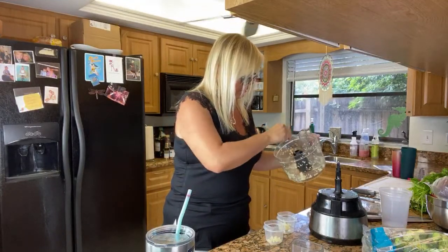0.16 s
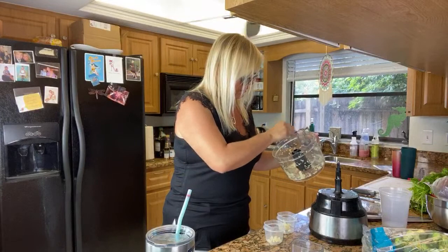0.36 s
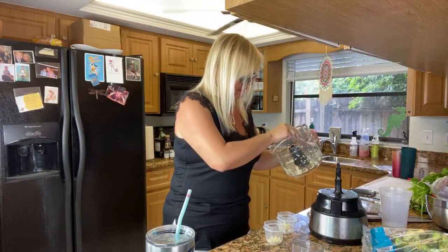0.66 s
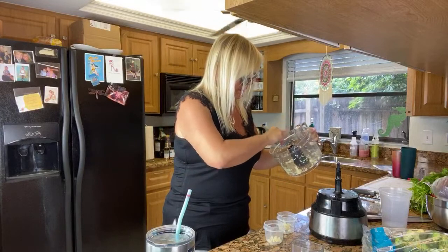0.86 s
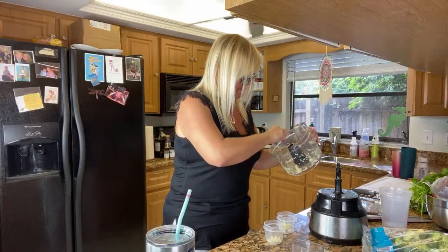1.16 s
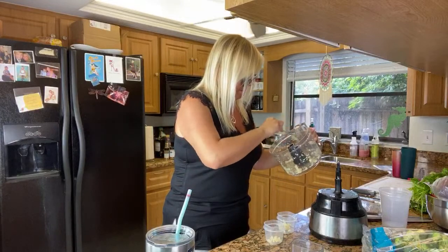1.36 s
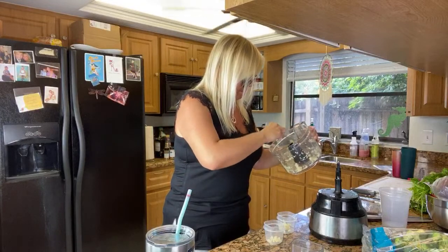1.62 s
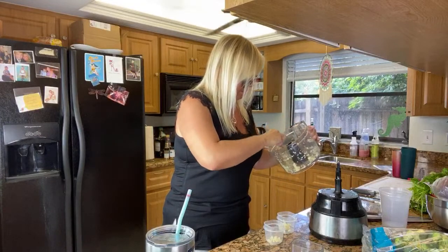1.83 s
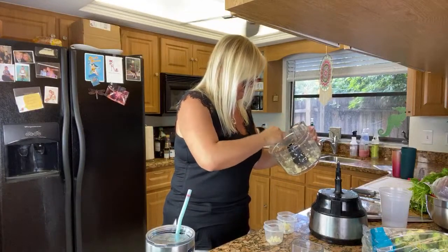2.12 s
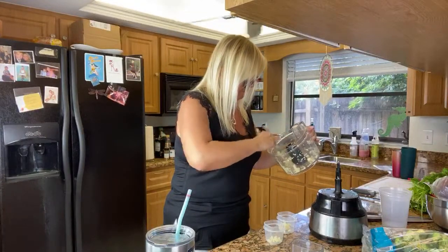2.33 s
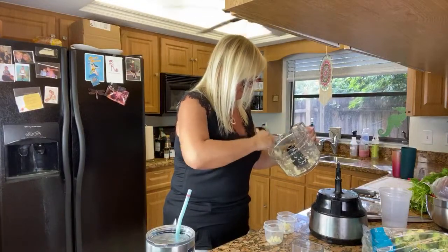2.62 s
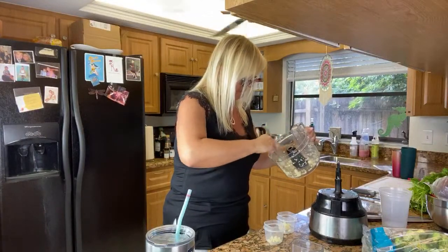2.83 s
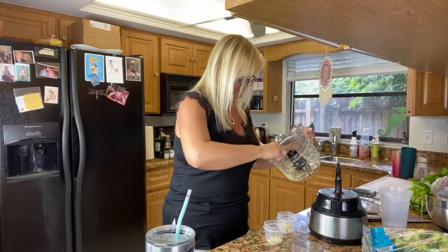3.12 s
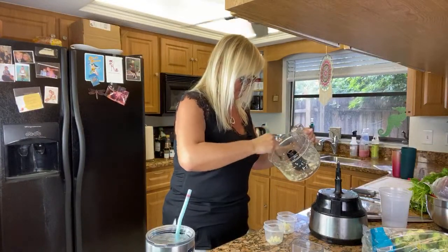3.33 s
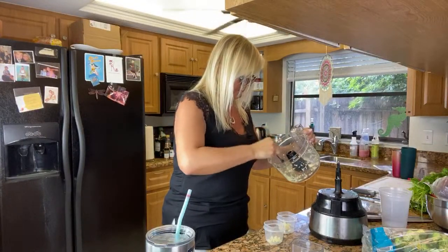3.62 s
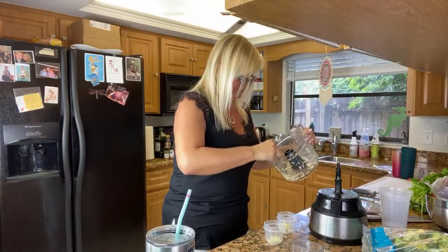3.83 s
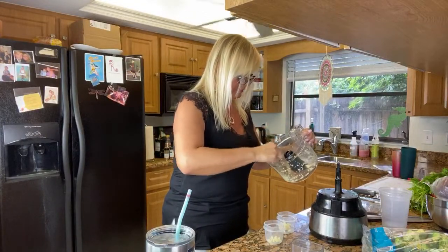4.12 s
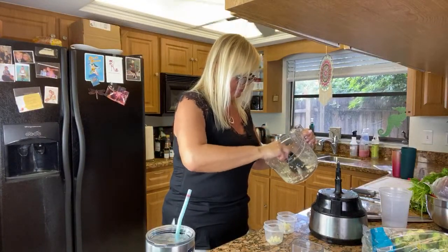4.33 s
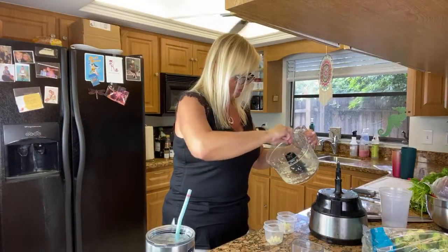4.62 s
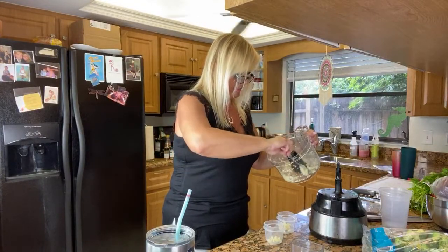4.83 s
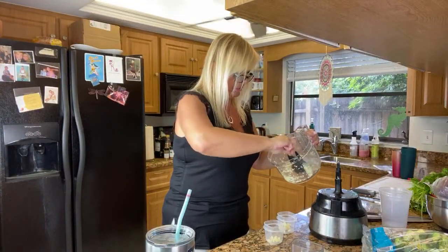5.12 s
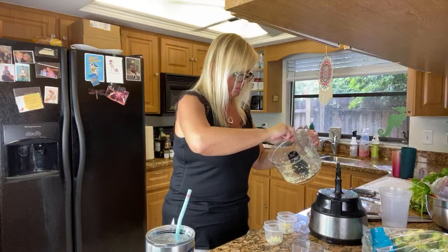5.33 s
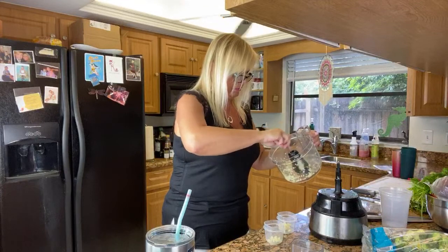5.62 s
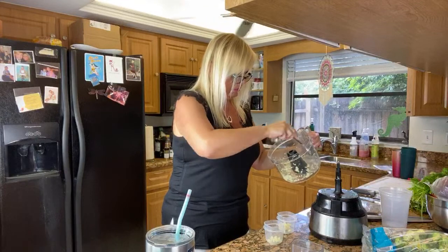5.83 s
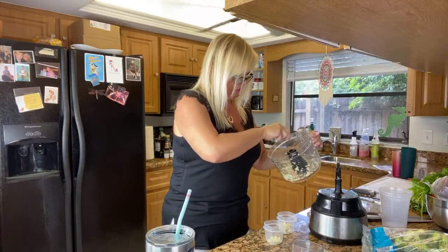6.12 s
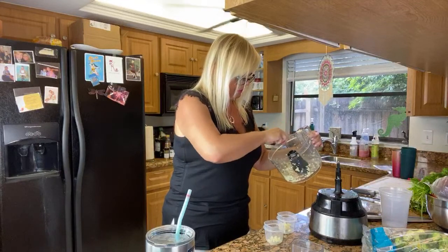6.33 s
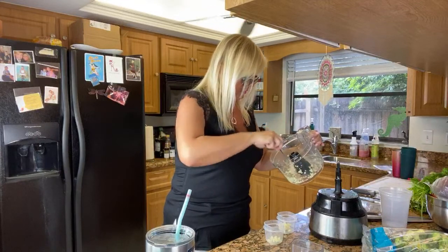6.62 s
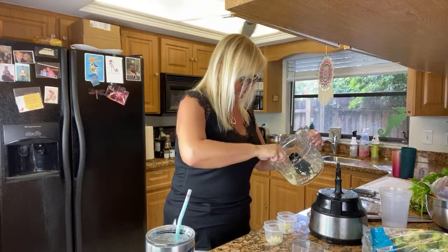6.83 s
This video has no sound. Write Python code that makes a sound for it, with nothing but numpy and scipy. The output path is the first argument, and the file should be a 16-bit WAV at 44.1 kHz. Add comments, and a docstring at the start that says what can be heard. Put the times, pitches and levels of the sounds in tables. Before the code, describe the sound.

A metal spoon knocks and scrapes irregularly inside a plastic food processor bowl, scooping out minced garlic in a kitchen.

```python
"""In a home kitchen, a metal spoon digs minced garlic out of a hand-held plastic food processor bowl.
The spoon scrapes through the wet paste by stick-slip friction and now and then grazes the wall.
Each knock is a brief chatter of impacts that excites the modes of the bowl's hollow and wall, with a
clack and a bright tick on top; bumps cushioned by garlic excite mostly the lowest modes.
The room reverberates, and a fridge hums over the low rumble of the house."""
import sys
import numpy as np
from scipy import signal
from scipy.fft import rfft, irfft
from scipy.io import wavfile

SR = 44100
rng = np.random.default_rng(int(sys.argv[2]) if len(sys.argv) > 2 else 0)


def int16_out(signal):
    """Quantize to a 16-bit WAV file."""
    q = np.round(np.clip(np.atleast_2d(signal).T, -1, 1) * 32767)
    wavfile.write(sys.argv[1], SR, q.astype(np.int16))


N = 307127

# spectrum of the house's rumble: (frequency [Hz], relative spectral level [dB])
RUMBLE_SPECTRUM = [(25, -18), (42, -10.5), (54, 1), (80, 1.5), (108, 9.5), (150, 3), (250, 4), (400, 1.5),
                   (700, -5), (1500, -9), (3000, -18), (7000, -23.5), (16000, -36)]
# scraping strokes: (start [s], length [s], level [dB])
STROKES = [(0.0, 0.0725, -52), (0.383, 0.1305, -50.5), (0.799, 0.1118, -45.5), (1.166, 0.065, -45.5),
           (1.424, 0.167, -56), (2.313, 0.121, -56), (2.604, .06, -56), (3.114, 0.054, -48.5),
           (3.48, 0.074, -46.5), (4.804, 0.0466, -55), (5.067, 0.072, -54), (5.382, 0.0924, -53),
           (5.929, 0.116, -59), (6.863, 0.073, -58.5)]
# normal modes of the bowl: (frequency [Hz], relative level [dB], t60 [s])
BOWL_MODES = [(340.5, -15.5, 0.134), (473.4, -18.5, 0.123), (533.34, 4.5, 0.081), (567.4, -10.5, 0.202),
              (616.5, -5, 0.0725), (955, -5, 0.0345), (1238.5, 14, 0.0744), (1304, -27, .08),
              (1500, -28.5, 0.09), (1682.4, 5.5, 0.031), (1818, -11, 0.079), (2138.7, 4, 0.135),
              (2054.3, 4.5, 0.067), (2484, 5, 0.116), (2699, -1.5, 0.215), (3075, 4, 0.069),
              (3343, 4.5, 0.046), (3640, -1, 0.18), (3963, 12.5, 0.15), (5118, 20, 0.036), (5830, -1, .08),
              (6246, -28, .02), (8130, 9.5, 0.102), (9754, 21, 0.021), (11700, -20.5, .02)]
# grazes of the spoon's edge on the wall: (time [s], level [dB])
GRAZES = [(0.0704, -51.5), (0.488, -51), (0.9237, -42), (1.4994, -46.5), (1.744, -52.5), (1.7878, -51.5),
          (2.3435, -44), (2.3705, -48.5), (5.9379, -50.5)]
# hard knocks: (time [s], level [dB], pitch of the struck spot [Hz], chatter decay [s],
# brightness [dB re level], hollow [dB re level])
KNOCKS = [(0.3137, -25.5, 1699, 0.004, -3.5, -9), (0.749, -25, 1593, 0.0037, -14.5, 0.5),
          (0.8567, -43, 1790, 0.0033, -8, -14), (1.141, -19.5, 1675, 0.0023, -18, -9.5),
          (1.3679, -31.5, 1670, 0.00232, -2, -12), (1.5692, -37, 1232, 0.0059, -6.5, -1),
          (1.845, -16, 1356, 0.00121, -23.5, -12), (2.066, -42.5, 1547, 0.0088, -4.5, -8.5),
          (2.0958, -16, 1364, 0.00239, -23.5, -11), (2.2558, -37, 1384, 0.00226, -6, -18.5),
          (2.572, -32, 1252, 0.00325, -16.5, -10.5), (2.785, -24.5, 1563, 0.0105, -5.5, -8),
          (3.0202, -27, 1500, 0.0046, -6, -6), (3.048, -33, 2000, 0.016, -8.5, -5.5),
          (3.095, -19.5, 1360, 0.0028, -16, -4.5), (3.4207, -22, 1764, 0.00344, -3, -7),
          (3.721, -23.5, 1688, 0.00303, -2, -10), (4.0451, -22, 1660, 0.00418, -7.5, -11),
          (4.377, -31, 2050, 0.00305, -9, -7), (4.4, -20.5, 1183, 0.0051, -13.5, -3.5),
          (4.7952, -39.5, 1710, 0.00323, -6.5, -8.5), (5.0186, -35, 1744, 0.0023, -9, -14),
          (5.122, -30, 1260, 0.00685, -4, -7.5), (5.3038, -27, 1707, 0.00315, -5.5, -13.5),
          (5.608, -25.5, 1524, 0.00392, -1.5, -8.5), (6.1259, -33.5, 1351, 0.00218, -16, -8),
          (6.229, -30.5, 1704, 0.00356, -4.5, -17.5), (6.341, -21, 1604, 0.00235, -15.5, -7),
          (6.5753, -34, 1317, 0.00156, -11, 1.5), (6.7883, -37.5, 1780, 0.0032, -8.5, -12),
          (6.815, -25, 1400, 0.00323, -12.5, -1.5)]
# soft bumps of the loaded spoon: (time [s], level [dB])
BUMPS = [(0.79, -36), (1.177, -33), (1.584, -33.5), (3.1319, -21), (3.551, -32), (3.574, -34),
         (4.2121, -47.5), (4.4388, -21), (5.1788, -25.5), (6.85, -28.5)]
# excitation spectra of scrape, clack, tick and hollow: (frequency [Hz], relative spectral level [dB])
SCRAPE_SPECTRUM = [(600, 5.5), (1800, 7.5), (3400, 5.5), (6000, -1.5), (9000, -3), (13500, -1.5),
                   (16000, -4)]
CLACK_SPECTRUM = [(500, -29), (1500, -3), (2400, -2.5), (3400, 1.5), (4200, -2), (5500, -10), (6500, -24),
                  (9000, -28)]
TICK_SPECTRUM = [(2500, -39.5), (4000, -9.5), (6000, 7), (8000, -1), (10000, -0.5), (12500, -3.5),
                 (16000, -5.5)]
HOLLOW_SPECTRUM = [(100, -42), (200, -19), (330, -7), (450, -4.5), (570, -5.5), (660, -5), (780, -6.5),
                   (950, -11), (1300, -40.5)]
# reverberation time of the kitchen: (frequency [Hz], t60 [s])
REVERB_TIMES = [(150, 0.3644), (530, 0.3433), (1400, 0.5948), (3700, 0.5468), (7000, 0.4349),
                (14000, 0.3443)]
# strength of the diffuse tail: (frequency [Hz], level [dB re direct sound])
REVERB_LEVELS = [(150, -15), (530, -2.5), (1400, -8), (3700, -5), (7000, -4), (14000, -6.5)]


def from_db(db):
    return 10 ** (np.asarray(db) / 20)


def rms_one(x):
    return x / np.sqrt(np.mean(x ** 2) + 1e-20)


def unit_blow(x, opening_s=.02):
    """Scales a transient to rms 1 over its opening."""
    return x / np.sqrt(np.mean(x[:round(opening_s * SR)] ** 2) + 1e-20)


def at_hz(points, hz):
    """Interpolates a table on a log-frequency axis."""
    frequencies, values = np.array(points).T
    return np.interp(np.log(np.maximum(hz, 1)), np.log(frequencies), values)


def colour(x, spectrum, size=4096):
    """Minimum-phase filter: folding the cepstrum makes the given spectrum causal."""
    gain = from_db(at_hz(spectrum, np.fft.rfftfreq(size, 1 / SR)))
    cepstrum = irfft(np.log(gain))
    cepstrum[1:size // 2] *= 2
    cepstrum[size // 2 + 1:] = 0
    return signal.fftconvolve(x, irfft(np.exp(rfft(cepstrum))))[:len(x)]


def ring(x, hz, t60):
    """Damped resonator: an impulse starts a cosine that falls 60 dB in t60 seconds."""
    radius, angle = from_db(-60 / (t60 * SR)), 2 * np.pi * hz / SR
    return signal.lfilter([.5, 0, -.5], [1, -2 * radius * np.cos(angle), radius * radius], x + 1e-18)


def band(x, low_hz, high_hz, order=2):
    """Butterworth band-pass."""
    edges = np.clip([low_hz, high_hz], 10, .48 * SR)
    return signal.sosfilt(signal.butter(order, edges, "band", fs=SR, output="sos"), x)


def low_cut(x, hz, order):
    """Butterworth high-pass."""
    return signal.sosfilt(signal.butter(order, hz, "high", fs=SR, output="sos"), x)


def add(track, s, sound):
    """Superposes a sound on the track at time s."""
    start = max(round(s * SR), 0)
    track[start:start + len(sound)] += sound[:N - start]


def rumble_and_hum(rumble_db=-53.5, hum_hz=118.5, hum_db=-65):
    """Steady ambient noise: the fridge's pure tone is superposed on the broadband rumble of the house."""
    rumble = rms_one(colour(rng.standard_normal(N), RUMBLE_SPECTRUM))
    hum = np.sqrt(2) * np.sin(2 * np.pi * hum_hz * np.arange(N) / SR)
    return from_db(rumble_db) * rumble + from_db(hum_db) * hum


def scraping(grains_per_s=1400, grabs_per_s=70, grab_db=4.0, ring_db=-15, pops_db=-5):
    """Stick-slip friction: garlic catches and slips under the spoon, driving the bowl with clicks."""
    t = np.arange(N) / SR
    grab = from_db(grab_db * np.interp(t * grabs_per_s, np.arange(N), rng.standard_normal(N)))
    sizes = grab * from_db(3.5 * np.minimum(rng.exponential(1, N), 4)) * rng.choice([-1, 1], N)
    slips = sizes * (rng.random(N) < grains_per_s / SR)
    grains = rms_one(colour(slips, SCRAPE_SPECTRUM))
    modes = rms_one(sum(from_db(db) * ring(grains, hz, t60) for hz, db, t60 in BOWL_MODES))
    return spoon_pressure() * (grains + from_db(ring_db) * modes + from_db(pops_db) * wet_pops())


def spoon_pressure(edge_s=0.0044):
    """Friction noise follows the load: each stroke presses on, holds and lets go."""
    out = np.zeros(N)
    for s, length_s, db in STROKES:
        t = np.arange(round((length_s + edge_s) * SR)) / SR
        trapezoid = np.minimum(np.minimum(t, t[::-1]) / edge_s, 1)
        add(out, s - edge_s / 2, from_db(db) * trapezoid)
    return out


def wet_pops(per_s=400, spread_db=2.0, cycles=40, pitch_count=18):
    """Cavity resonance: tiny air pockets burst in the paste, each ringing briefly at its own pitch."""
    sizes = from_db(spread_db * np.minimum(rng.exponential(1, N), 3.5))
    bursts = sizes * (rng.random(N) < per_s / SR)
    pitch_index = rng.integers(0, pitch_count, N)
    pitches = np.geomspace(3000, 15000, pitch_count)
    return rms_one(sum(ring(bursts * (pitch_index == k), hz, cycles / hz) * np.sqrt(hz)
                       for k, hz in enumerate(pitches)))


def grazes(decay_s=0.0062, tick_db=-2):
    """Glancing impacts excite only the upper modes: a small clack and a tick."""
    out = np.zeros(N)
    for s, db in GRAZES:
        touch = clack(decay_s, ring_db=-12) + from_db(tick_db) * tick(decay_s, tilt_db_per_octave=7)
        add(out, s, from_db(db) * touch)
    return out


def chatter(decay_s, rise_s=.0007, strike_db=0, length_s=.16):
    """Contact force: one impulse and a burst of tiny rebounds that decays exponentially."""
    t = np.arange(round(length_s * SR)) / SR
    force = rng.standard_normal(len(t)) * (1 - np.exp(-t / rise_s)) * (np.exp(-t / decay_s) + 1e-9)
    force[round(rise_s * SR)] += from_db(strike_db)
    return force


def bowl_response(force, low_hz, high_hz, ring_db, spot_db=4.5):
    """Modal superposition: forced motion plus one range of modes, weighted by a random striking spot."""
    modes = sum(ring(force, hz, t60) * from_db(db + spot_db * rng.standard_normal())
                for hz, db, t60 in BOWL_MODES if low_hz < hz < high_hz)
    return unit_blow(unit_blow(force) + from_db(ring_db) * unit_blow(modes))


def clack(decay_s, ring_db):
    """Hard impact of metal on stiff plastic: each spot favours a few of the upper modes."""
    force = colour(chatter(decay_s), CLACK_SPECTRUM)
    return bowl_response(force, 2300, 6200, ring_db, spot_db=13.5)


def tick(decay_s, tilt_db_per_octave, pivot_hz=10000):
    """A fast-rising force reaches the highest modes; a bare spot tilts its spectrum upwards."""
    spectrum = [(hz, db + tilt_db_per_octave * np.log2(hz / pivot_hz)) for hz, db in TICK_SPECTRUM]
    force = colour(chatter(decay_s, rise_s=0.00046, strike_db=-13), spectrum)
    return bowl_response(force, 6200, 16000, ring_db=-19.5)


def knocks():
    """Impulsive excitation: a hard contact sounds wall, hollow, clack and tick, and leaves a note."""
    out = np.zeros(N)
    for s, db, spot_hz, decay_s, bright_db, hollow_db in KNOCKS:
        # a short, dull contact leaves the wall a narrower, more pitched note
        width_hz = min(spot_hz, 809.6 * (decay_s / 0.00336) ** 0.225 * 2 ** (.035 * bright_db))
        # a barer contact is brighter: more clack, a sharper tick, less lingering note
        clack_db = 1.8639 + 0.5617 * bright_db
        tilt_db_per_octave = 4.5 + 0.376 * bright_db
        note_db = -18.5 - 0.419 * bright_db
        blow = (wall(spot_hz, width_hz, decay_s=2.326 * decay_s, ring_db=-4.5)
                + from_db(hollow_db) * hollow(decay_s=1.696 * decay_s, ring_db=-2.5)
                + from_db(clack_db) * clack(decay_s=1.565 * decay_s, ring_db=-16.5)
                + from_db(bright_db) * tick(decay_s, tilt_db_per_octave))
        add(out, s, from_db(db) * blow)
        add(out, s, from_db(db + note_db) * lingering_note(spot_hz))
    return out


def wall(spot_hz, width_hz, decay_s, ring_db, skirt_db=-11):
    """Flexural vibration: the wall bends at a pitch set by the struck spot and drives the modes near it."""
    force = chatter(decay_s, strike_db=14.5)
    flex = band(force, spot_hz - width_hz / 2, spot_hz + width_hz / 2, order=3)
    skirt = unit_blow(band(chatter(decay_s), low_hz=970.3, high_hz=2168, order=4))
    return unit_blow(bowl_response(flex, 850, 2600, ring_db) + from_db(skirt_db) * skirt)


def hollow(decay_s, ring_db):
    """Resonance of the lowest modes gives the bowl its boxy note."""
    force = colour(chatter(decay_s, rise_s=0.002267), HOLLOW_SPECTRUM)
    return bowl_response(force, 200, 1000, ring_db)


def lingering_note(spot_hz, t60=0.215, loss_db_per_hz=0.01):
    """Free vibration: the strongest mode near the pitch of the struck spot rings on after the blow."""
    hz, _, _ = max(BOWL_MODES, key=lambda mode: mode[1] - loss_db_per_hz * abs(mode[0] - spot_hz))
    return unit_blow(ring(signal.unit_impulse(round(t60 * SR)), hz, t60))


def bumps(firm_db=-20, wall_db=-1.5, clack_db=-11.5, rebound_s=.024, rebound_db=-9.5):
    """Cushioned impact: garlic softens the spoon's landing and rebound, so mostly low modes answer."""
    out = np.zeros(N)
    for s, db in BUMPS:
        through_db = 0.23 * (db - firm_db)   # a firmer bump pushes through to the wall
        for delay_s, landing_db in ((0, 0), (rebound_s, rebound_db)):
            flex = wall(spot_hz=1260, width_hz=182, decay_s=0.0095, ring_db=-6.0, skirt_db=-8.5)
            upper = from_db(wall_db) * flex + from_db(clack_db) * clack(decay_s=0.0089, ring_db=-28.5)
            landing = hollow(decay_s=0.00313, ring_db=5.5) + from_db(through_db) * upper
            add(out, s + delay_s, from_db(db + landing_db) * landing)
    return out


def kitchen_response(length_s=.7, build_s=0.00347, early_db=-8, echo_count=9):
    """Reverberation: early reflections off counter and cupboards, and a tail that dies band by band."""
    t = np.arange(round(length_s * SR)) / SR
    build_up = 1 - np.exp(-(t / build_s) ** 2)
    edges = np.geomspace(90, 18000, 16)
    diffuse = np.zeros(len(t))
    for low, high in zip(edges, edges[1:]):
        hz = np.sqrt(low * high)
        decay = from_db(-60 * t / at_hz(REVERB_TIMES, hz))
        tail = band(rng.standard_normal(len(t)), low, high, order=3) * decay * build_up
        impulse_rms = np.sqrt(2 * (high - low) / SR / len(t))   # a unit impulse's share in this band
        diffuse += from_db(at_hz(REVERB_LEVELS, hz)) * rms_one(tail) * impulse_rms
    lags = (rng.uniform(0.002995, .024, echo_count) * SR).astype(int)
    echoes = np.zeros(len(t))
    echoes[lags] = from_db(early_db) * rng.choice([-1, 1], echo_count) / np.sqrt(echo_count)
    return diffuse + band(echoes, low_hz=150, high_hz=4860, order=1)


def kitchen(directions):
    """Multipath propagation: the first direction arrives straight; each returns by its own reflections."""
    returns = sum(signal.oaconvolve(x, kitchen_response())[:N] for x in directions)
    return directions[0] + returns / np.sqrt(len(directions))


def scene(direction_count=3):
    """Directional radiation: the bowl sends each impact out with a different fine grain each way."""
    scrape = scraping()
    directions = [knocks() + grazes() + bumps() + scrape for _ in range(direction_count)]
    bowl = low_cut(kitchen(directions), hz=220.4, order=4)   # a small bowl radiates no bass
    return (bowl + rumble_and_hum())[None]


def record(dry, cutoff_hz=16000):
    """Band limiting: the microphone drops the deepest bass, and the top is cut steeply."""
    heard = low_cut(dry, hz=42, order=4)
    return signal.sosfilt(signal.ellip(10, .1, 80, cutoff_hz, fs=SR, output="sos"), heard)


dry = scene()
out = record(dry)
int16_out(out)
```